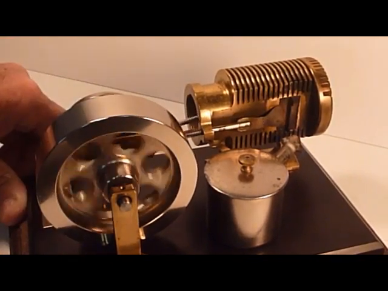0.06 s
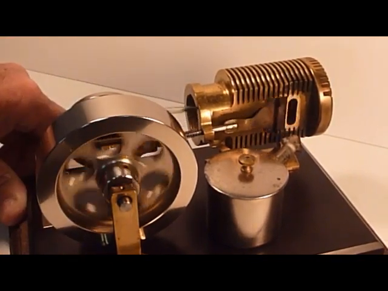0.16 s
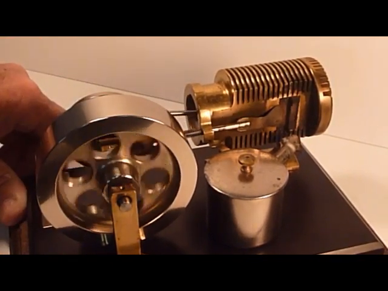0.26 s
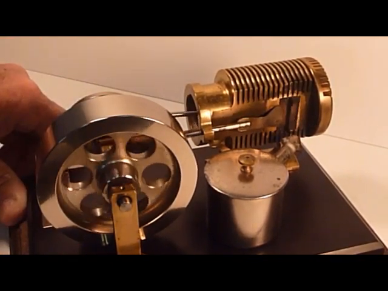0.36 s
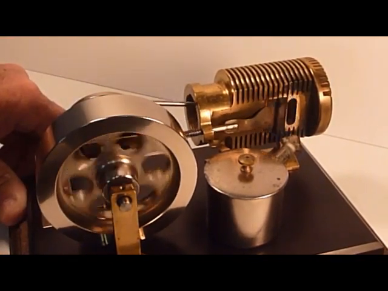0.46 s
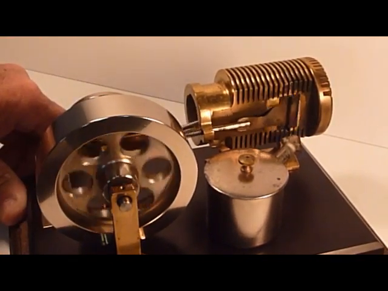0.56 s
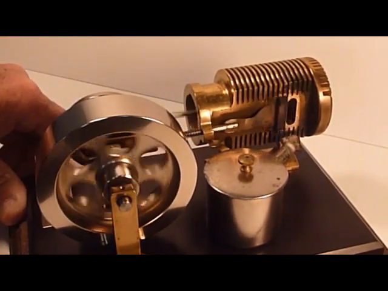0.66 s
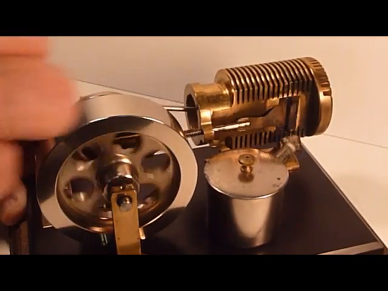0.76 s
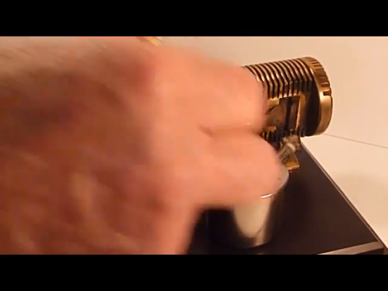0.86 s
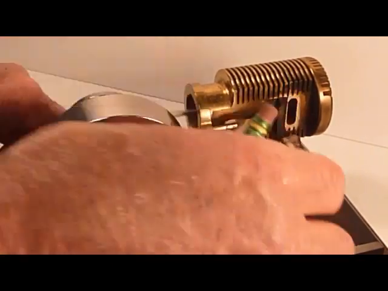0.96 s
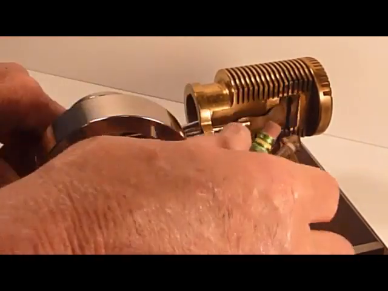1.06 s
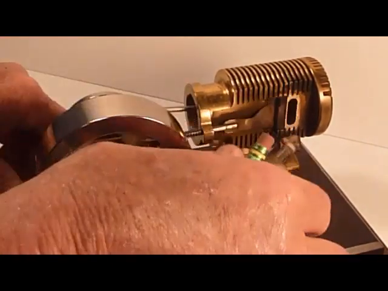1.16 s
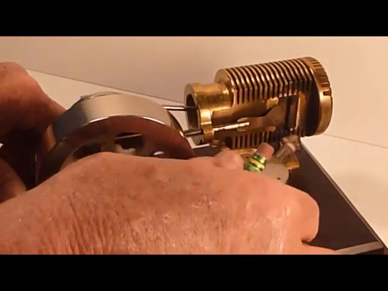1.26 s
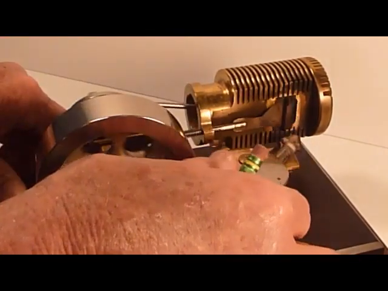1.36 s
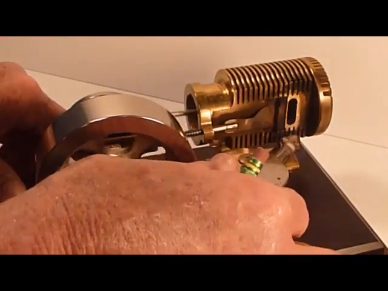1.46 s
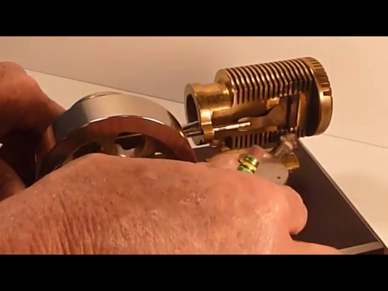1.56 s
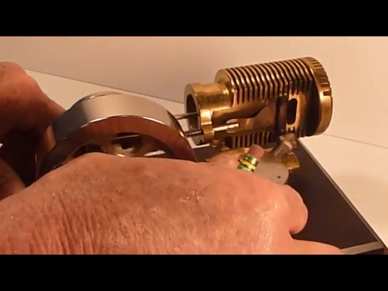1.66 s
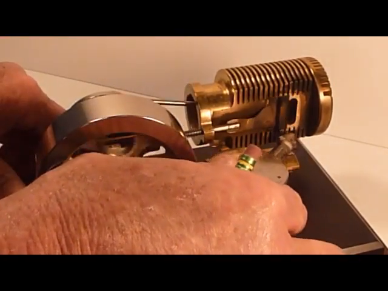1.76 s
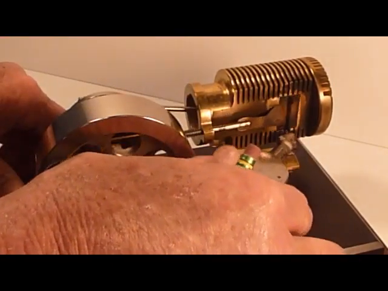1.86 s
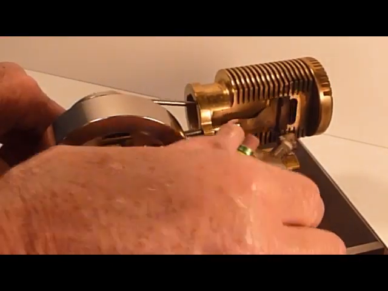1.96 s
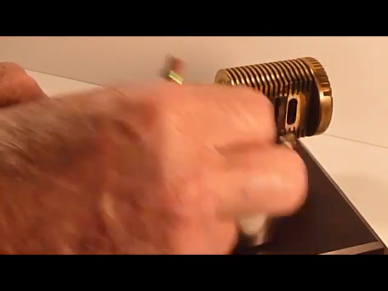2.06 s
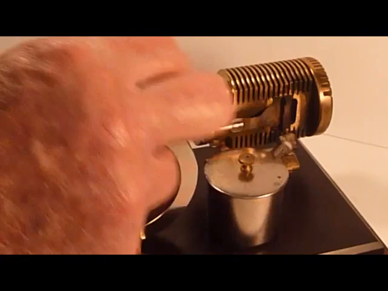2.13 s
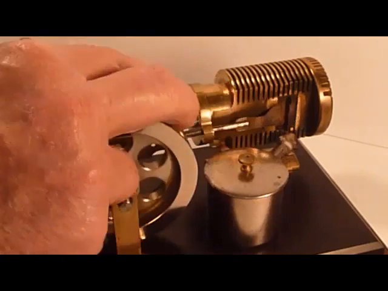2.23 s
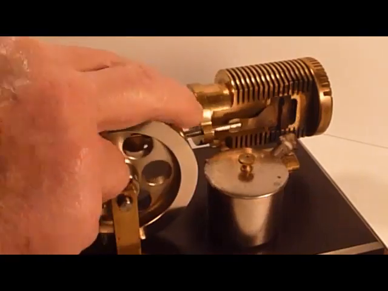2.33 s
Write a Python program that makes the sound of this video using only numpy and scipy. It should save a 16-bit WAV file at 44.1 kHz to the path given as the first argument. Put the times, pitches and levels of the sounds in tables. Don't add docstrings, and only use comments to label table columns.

```python
import sys
import numpy as np
from scipy import signal
from scipy.fft import rfft, irfft, next_fast_len
from scipy.io import wavfile
from scipy.ndimage import uniform_filter1d, map_coordinates

SR = 44100
rng = np.random.default_rng(int(sys.argv[2]) if len(sys.argv) > 2 else 0)


def wrap_up_sound(samples):
    columns = np.atleast_2d(samples).T
    tamed = np.clip(columns, -1, 1)
    steps = np.round(tamed * 32767).astype(np.int16)
    wavfile.write(sys.argv[1], SR, steps)


def invert_db(level):
    return 10 ** (np.asarray(level, dtype=float) / 20)


N = 103635
T = np.arange(N) / SR
LEFT_RIGHT = np.array([[1], [-1]])

# (frequency [Hz], likeness [0-1])
STEREO_LIKENESS = [(30, 1), (60, 0.9059), (150, 0.98325), (400, 0.96135), (1030, 0.7525), (2650, 0.24),
                   (6840, 0.15)]


def unit(x):
    return x / np.sqrt(np.mean(x ** 2) + 1e-20)


def along(points, hz):
    f, v = np.transpose(points)
    return np.interp(np.log(hz + 1), np.log(f + 1), v)


def curves(rows):
    s, *cols = np.transpose(rows)
    return [np.interp(T, s, c) for c in cols]


def wobble(rate):
    knots = rng.standard_normal(int(N / SR * 100) + 4)
    return map_coordinates(knots, [np.arange(N) * min(rate, 99) / SR])


def near_mono_noise(spread):
    return rng.standard_normal(N) + spread * rng.standard_normal((2, N))


def filtered(x, response):
    m = next_fast_len(N + SR // 2)
    return irfft(rfft(x, m) * response(np.fft.rfftfreq(m, 1 / SR)), m)[..., :N]


def bass_cut(x, hz):
    return filtered(x, lambda f: (1j * f / (hz + 1j * f)) ** 2)


def peaks(rows):
    def response(f):
        total = 0
        for k, (center, width, db) in enumerate(rows):
            damping = 1j * f * width
            total = total + (-1) ** k * invert_db(db) * damping / (center * center - f * f + damping)
        return total
    return response


def ring(modes, t, wave=np.sin, lag_s=0):
    out = np.zeros((2, N))
    start = max(np.searchsorted(t, 0) - SR // 100, 0)
    t = t[start:start + SR // 6] - np.array([[0], [lag_s]])
    u = np.maximum(t, 0)
    total = 0
    for hz, db, t60, pan_db in modes:
        level_db = db + rng.normal(0, 1) + pan_db / 2 * LEFT_RIGHT - 60 * u / t60
        total = total + invert_db(level_db) * wave(2 * np.pi * hz * u)
    out[:, start:start + t.shape[1]] = (t >= 0) * total
    return out


def knock(modes, t, rise_s):
    low = ring(modes, t, np.cos)
    return low + (t < 0) * np.exp(np.minimum(t, 0) / rise_s) * low.max()


def grains(rate, spread_db):
    hit = rng.random(N) < rate / SR
    return unit(hit * rng.standard_normal(N) * invert_db(spread_db * rng.exponential(size=N)))


def air():
    # (frequency [Hz], density [dB per Hz])
    spectrum = [(25, -25), (114, -13.5), (275, -5), (711, -18), (2800, -28.5), (7000, -43), (8000, -45),
                (9500, -50)]

    def mid_side(hz):
        angle = np.arccos(np.clip(along(STEREO_LIKENESS, hz), -1, 1)) / 2
        return invert_db(along(spectrum, hz)) * [np.cos(angle), np.sin(angle)]

    mid, side = filtered(rng.standard_normal((2, N)), mid_side)
    return invert_db(-38 + wobble(6)) * unit(np.array([mid + side, mid - side]))


def drone():
    # (frequency [Hz], width [Hz], level [dB])
    tones = [(119, 7, -45), (274, 7, -41)]
    total = 0
    for hz, width, db in tones:
        tone = peaks([(hz, width, 0)])
        total = total + invert_db(db) * unit(filtered(rng.standard_normal(N), lambda f: tone(f) ** 2))
    return total


def flywheel():
    # (time [s], level [dB])
    effort = [(0, -39), (.45, -39.5), (.7, -34.5), (1.05, -36), (1.3, -35), (1.65, -34.5), (2.0, -33),
              (2.35, -33)]
    # (frequency [Hz], width [Hz], level [dB])
    wood = [(116.52, 26.71, -12.5), (175.74, 14.303, -4), (212.38, 18.608, -0.5), (273.02, 21.36, -3),
            (365.3, 38.16, -9), (482.63, 61.49, -11), (634.14, 154.04, -12.5)]
    # (time [s], length [s], level [dB])
    squeaks = [(1.42, .07, -60), (1.6, .07, -61), (1.78, .09, -60), (1.99, .06, -60)]
    squeak_hz = 3400

    [effort_db] = curves(effort)
    thuds = grains(1100, spread_db=1.2) * invert_db(2.131 * wobble(16))
    rumble = unit(filtered(thuds, lambda f: peaks(wood)(f) / (1 + 1j * f / 500) ** 2))
    gate = sum(invert_db(db) * np.sin(np.pi * np.clip((T - s) / length, 0, 1)) for s, length, db in squeaks)
    squeak = gate * invert_db(3 * wobble(40)) * np.sin(2 * np.pi * squeak_hz * T + 1.4 * wobble(54))
    return invert_db(effort_db) * rumble * invert_db(-.3 * LEFT_RIGHT) + squeak


def slide():
    # (time [s], hiss [dB], hollow [dB], whir [dB], ringing [dB])
    motion = [(0, -71.5, -39.5, -41, -84), (.1, -61.5, -56, -53.5, -59.5), (.2, -56.5, -48, -52.5, -53.5),
              (.26, -78, -38, -35.5, -58), (.33, -58.5, -38, -39, -54.5), (.42, -54.5, -50.5, -47.5, -52),
              (.52, -54, -53.5, -52, -48), (.63, -57.5, -50, -54.5, -55.5), (.73, -55, -54.5, -45, -45),
              (.8, -56.5, -47.5, -47, -49.5), (.88, -64.5, -59, -65, -59.5), (.95, -76, -89, -82.5, -88)]
    # (frequency [Hz], width [Hz], level [dB])
    cavity = [(671, 94, 0)]
    whir = [(1791.7, 150, 3.5), (1840.9, 143.18, 6.5)]
    thin_metal = [(2673.3, 56, 9.5), (3506.9, 150, -7.5)]
    hiss = [(4353.1, 910, 0), (5218.6, 60, 3.5), (6031.8, 380, -1.5), (6561.6, 220, 1), (7425.7, 260, -0.5),
            (8500, 210, 1), (9289.2, 210, -7.5), (10160, 450, -6), (10740, 200, -13.5)]
    whine_hz, whine_db, left_db = 2680, -3, 12

    hiss_db, hollow_db, whir_db, ringing_db = curves(motion)
    rub = grains(2700, spread_db=1.5) * invert_db(1.1 * wobble(30))
    rub = rub + .6 * rng.standard_normal((2, N))
    hollow = unit(filtered(rub, peaks(cavity))) * invert_db(hollow_db)
    hollow = hollow + unit(filtered(rub, peaks(whir))) * invert_db(whir_db - 1.5 * LEFT_RIGHT)
    whine = invert_db(whine_db + 2 * wobble(30)) * np.sin(2 * np.pi * whine_hz * T + 1.5 * wobble(25))
    thin = (unit(filtered(rub, peaks(thin_metal))) + whine) * invert_db(ringing_db)
    thin = thin + unit(filtered(rub, lambda f: peaks(hiss)(f) ** 2)) * invert_db(hiss_db)
    return hollow + thin * invert_db(left_db / 2 * LEFT_RIGHT)


def clack():
    # (time [s], low body [dB], ringing [dB], crack [dB])
    contacts = [
        (0.2203, -28, -20, -17),
        (0.2273, -1.5, -35.5, -8.5),
        (0.2286, -39.5, 6.5, -8.5),
        (0.2304, -2.5, -7.5, -18.5),
        (0.2384, -18, -25.5, -43.5),
        (0.2488, -19, -25, -46),
        (0.2585, -20, -28, -50.5),
        (0.264, -28, -30.5, -51),
    ]
    # (frequency [Hz], level [dB], t60 [s], left over right [dB])
    low_modes = [(339.97, -1.5, 0.01768, 3), (480.55, -5, 0.1011, -0.5), (649.6, -7, 0.02935, 2.5),
                 (764.1, -21, 0.021, -6), (1119.6, -22, 0.06624, -12)]
    high_modes = [(1564.5, -15.5, 0.04619, -1), (1804.1, -6, 0.018, -2.5), (1817.4, 3.5, 0.016844, -1),
                  (1899.3, -8.5, 0.016756, -6), (2685.2, -31, .007, 1.5), (3355.3, -5, 0.01092, -1.5),
                  (3860.6, -19, 0.013925, -10.5), (4476.4, -14, 0.01426, -4.5), (5386.6, -20, 0.011, -5)]
    crack_hz, crack_t60_s, swell_s = 3422.8, .008, .0014

    out = np.zeros((2, N))
    grit = filtered(near_mono_noise(0.44), lambda f: 1 / (1 + 1j * f / crack_hz) ** 2)
    for s, low_db, ring_db, crack_db in contacts:
        t = T - s
        out += invert_db(low_db) * knock(low_modes, t, rise_s=.00012)
        swell = 1 - np.exp(-abs(t) / swell_s)
        out += invert_db(ring_db) * swell * ring(high_modes, t, lag_s=-0.0000347)
        out += (t > 0) * invert_db(crack_db - 60 * np.maximum(t, 0) / crack_t60_s) * grit
    return out


def valve():
    # (time [s], level [dB], air push length [s], jet [dB], softness [s])
    pops = [
        (0.5570, -5.5, .0028, -34, 0.00012),
        (1.01445, -5.5, 0.0032, -28, 0.00009),
        (1.4890, -5.5, 0.0033, -25, 0.00013),
        (2.0414, -9, 0.004, -29, 0.0003),
    ]
    # (frequency [Hz], level [dB], t60 [s], left over right [dB])
    base = [(209.98, -1, 0.042574, 1), (265.99, -16, 0.07357, 3), (464.22, -15.5, 0.1208, -3.5),
            (754.38, -14.5, 0.021, 0), (1135.2, -14.5, 0.02887, -1.5), (1116.6, -11.5, 0.014, -2)]
    plate = [(470.6, 4, 0.0041, -1.5), (1094.6, -15, 0.022, -4.5), (1310.8, -16, 0.07099, -5.5)]
    spring = [(2322.3, -1, 0.019, -4), (2492.9, -1.5, 0.018, -1.5), (6800, -13, 0.035, 3.5),
              (9308, -26, .05, -9.5)]
    # (frequency [Hz], width [Hz], level [dB])
    jet = [(2590, 630, -12.5), (3753, 780, -6.5), (5032, 701, 0.5), (6482.7, 685, -2), (9404, 1000, -11)]
    push_db, suck_db, suck_s = 1, -10, .0035
    rebound_s, rebound_db, spring_db, jet_s = 0.0017812, -9, 3, 0.0013229

    out = np.zeros((2, N))
    hiss = unit(filtered(near_mono_noise(0.33), peaks(jet)))
    for s, db, push_s, jet_db, soft_s in pops:
        t = T - s
        push = invert_db(push_db) * np.sin(np.pi * np.clip(-t / push_s, 0, 1) ** .45) ** 1.2
        suck = invert_db(suck_db) * np.sin(np.pi * np.clip((-t - push_s) / suck_s, 0, 1))
        body = push - suck - ring(base, t, np.cos, lag_s=.00003)
        keep = np.exp(-1 / (soft_s * SR))
        snap = signal.lfilter([(1 - keep) ** 2], [1, -2 * keep, keep ** 2], body)
        late = t - rebound_s - 2 * soft_s
        out += invert_db(db) * (snap + invert_db(rebound_db) * ring(plate, late, lag_s=.00005))
        puff = hiss * np.exp(-abs(t + jet_s) / jet_s)
        out += invert_db(jet_db) * (puff + invert_db(spring_db) * ring(spring, late, lag_s=.00005))
    return out


def cam():
    # (time [s], level [dB], brightness [dB], second contact [dB])
    ticks = [
        (0.7484, -18, 2, -10.5),
        (1.22, -18.5, 1, -4),
        (1.7335, -14, 0, -18),
    ]
    # (time [s], level [dB])
    pings = [
        (1.666, -41.5),
        (1.7296, -37),
        (1.852, -37),
    ]
    # (frequency [Hz], level [dB], t60 [s], left over right [dB])
    low_modes = [(279.17, -2.5, 0.055, 1.5), (389.8, -8.5, 0.039, -0.5), (467.6, -9.5, 0.13446, 0.5),
                 (689, -11.5, 0.041, -3.5)]
    high_modes = [(1230.7, -29.5, 0.06065, 0), (1596.7, -12.5, 0.03539, -6), (1735.4, -16, .025, -3),
                  (2010.4, -17.5, 0.017, -9), (2780, -13.5, 0.011, -9), (3470, -15.5, 0.0041, 8),
                  (4550.9, -14.5, 0.013, -1), (5053.4, -22.5, 0.011, 6)]
    pin_on_cam = [(11010, -34, .02, -10.5), (11333, -27.5, .015, 0.5)]
    loose_pin = [(4707, -3.5, 0.0051, -2.5), (5476, -12, 0.004, 4), (6950, -17.5, 0.0018, -1),
                 (9565.6, -26, 0.0059, 2.5)]
    second_s, soft_hz = 0.0015873, 3530

    thud, bright = np.zeros((2, 2, N))
    for s, db, bright_db, second_db in ticks:
        t = T - s
        thud += invert_db(db) * knock(low_modes, t, rise_s=.0003)
        first = ring(high_modes, t, lag_s=-0.0000607)
        second = ring(high_modes + pin_on_cam, t - second_s, lag_s=-0.000029)
        bright += invert_db(db + bright_db) * (first + invert_db(second_db + 10.5) * second)
    pin_ticks = sum(invert_db(db) * ring(loose_pin, T - s) for s, db in pings)
    return filtered(thud, lambda f: np.exp(-(f / soft_hz) ** 2)) + bright + pin_ticks


def room(x):
    # (frequency [Hz], t60 [s])
    decay = [(200, 0.15473), (1500, 0.16666), (6000, 0.022665)]
    wall_s = 0.0072

    hz, t, z = signal.stft(rng.standard_normal((2, SR // 3)), SR, nperseg=256)
    alike = np.clip(along(STEREO_LIKENESS, hz), 0, 1)[:, None]
    z = np.array([z[0], alike * z[0] + np.sqrt(1 - alike ** 2) * z[1]])
    tail = signal.istft(z * invert_db(-60 * t / along(decay, hz)[:, None]), SR, nperseg=256)[1]
    late = np.pad(x.mean(0), (round(wall_s * SR), 0))[None]
    return signal.fftconvolve(late, tail / np.linalg.norm(tail[0]), axes=1)[:, :N]


def scene():
    blow = bass_cut(clack(), 120)
    knocks = valve() + cam()
    hits = knocks + blow + invert_db(-19) * (room(knocks) + invert_db(1.5) * room(blow))
    return bass_cut(hits, 85) + slide() + flywheel() + air() + drone()


def thin_top(x):
    top_hz, keep_db, soft_db, drift_db = 7329, -92.5, 2, 1.5
    hz, s, z = signal.stft(x, SR, nperseg=768, boundary="even")
    power = uniform_filter1d((abs(z) ** 2).mean(0), size=3, axis=1)
    power = uniform_filter1d(power, size=3, axis=0)
    level_db = 10 * np.log10(abs(power) + 1e-20)
    threshold_db = keep_db + drift_db * np.interp(s, T, wobble(16))
    keep = (1 + np.tanh((level_db - threshold_db) / soft_db)) / 2
    return signal.istft(z * np.where(hz[:, None] < top_hz, 1, keep), SR, nperseg=768)[1][:, :N]


def fizz():
    # (frequency [Hz], density [dB per Hz])
    spectrum = [(8500, -60), (8800, -2), (9500, 0), (10300, -5), (10700, -60)]
    hz, _, z = signal.stft(near_mono_noise(.4), SR, nperseg=512)
    field = uniform_filter1d(rng.standard_normal(z.shape[1:]), size=3, axis=0)
    field = uniform_filter1d(field, size=9, axis=1)
    z = z * (unit(field) > .5) * invert_db(along(spectrum, hz))[:, None]
    return invert_db(-86.5) * unit(signal.istft(z, SR, nperseg=512)[1][:, :N])


def roll_off(x):
    return signal.sosfilt(signal.butter(12, 15500, fs=SR, output="sos"), x)


def record(dry):
    # (frequency [Hz], level [dB])
    mic = [(6900, -1), (8000, -26.5), (9500, -4.5), (11200, -16.5), (12500, -19.5), (16000, -23)]
    limit_db, release_db_per_s, knee = -2, 56, 8

    over_db = np.maximum(20 * np.log10(abs(dry).max(0) + 1e-9) - limit_db, 0)
    release_db = release_db_per_s * T
    duck_db = np.maximum.accumulate(over_db + release_db) - release_db
    duck_db = uniform_filter1d(np.pad(np.maximum(duck_db, 0), (60, 0))[:N], size=121)
    fade = np.sin(np.pi / 2 * np.clip((T[-1] - T) * 200, 0, 1)) ** 2
    x = filtered(dry * invert_db(-duck_db) * fade, lambda hz: invert_db(along(mic, hz)))
    x = x / (1 + abs(x) ** knee) ** (1 / knee)
    return roll_off(thin_top(x) + fizz() * fade)


dry = scene()
out = record(dry)
wrap_up_sound(out)
```